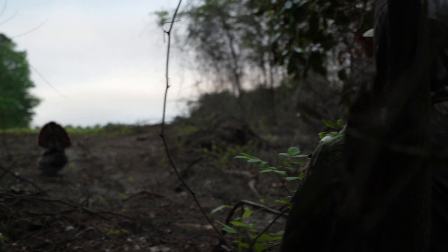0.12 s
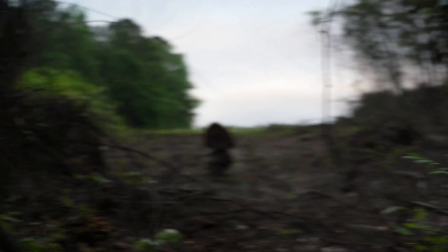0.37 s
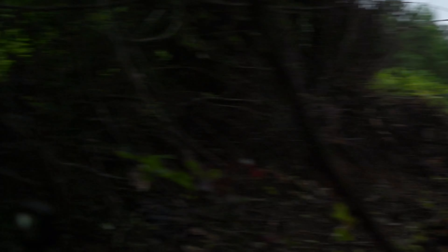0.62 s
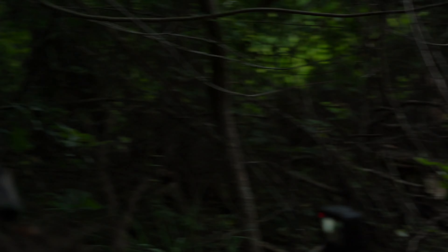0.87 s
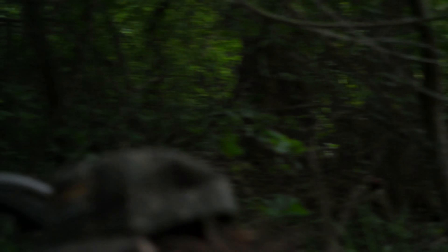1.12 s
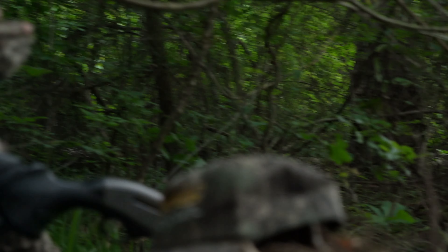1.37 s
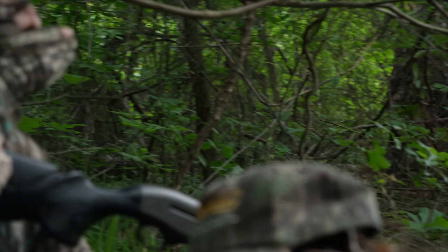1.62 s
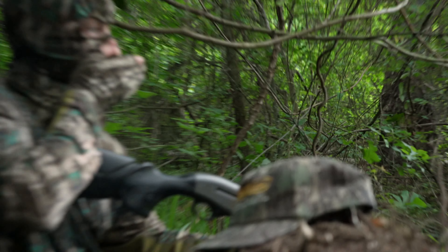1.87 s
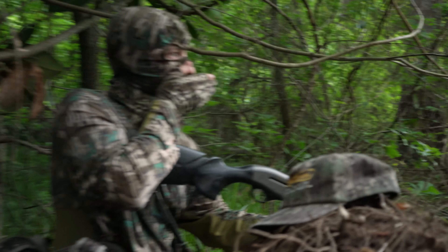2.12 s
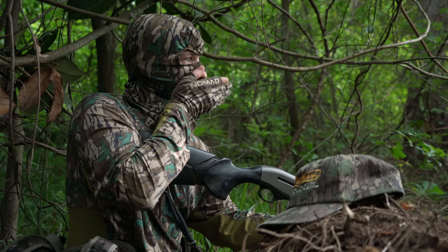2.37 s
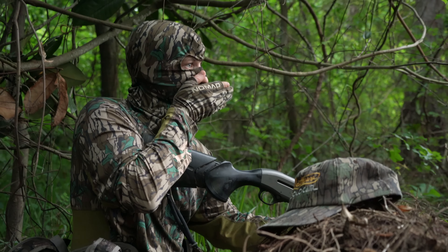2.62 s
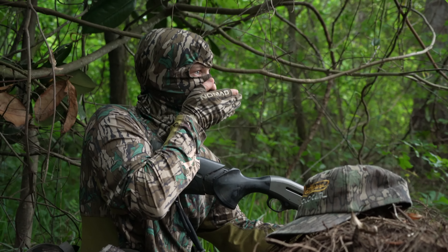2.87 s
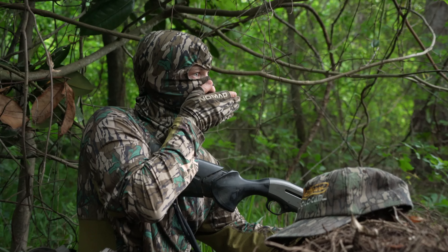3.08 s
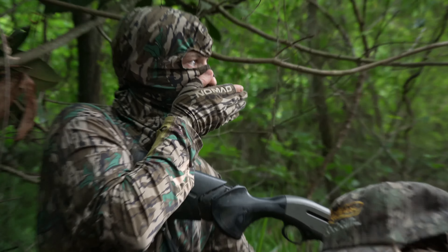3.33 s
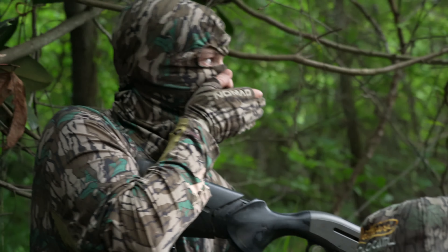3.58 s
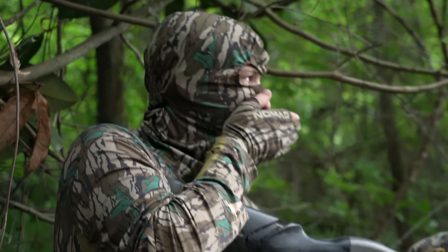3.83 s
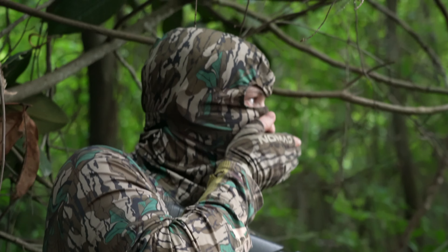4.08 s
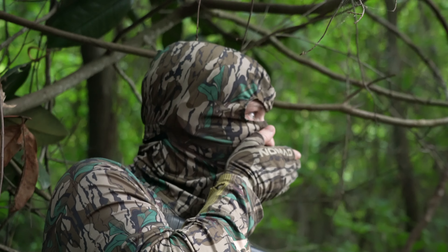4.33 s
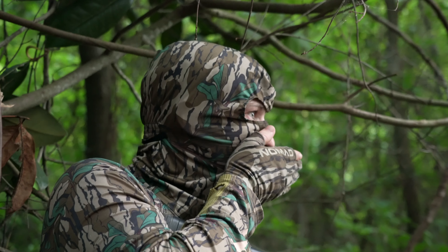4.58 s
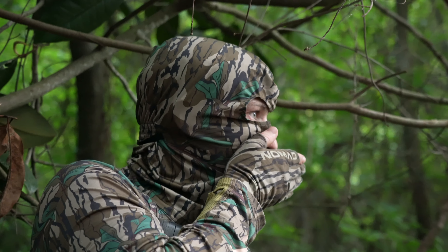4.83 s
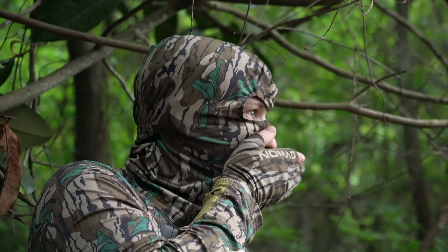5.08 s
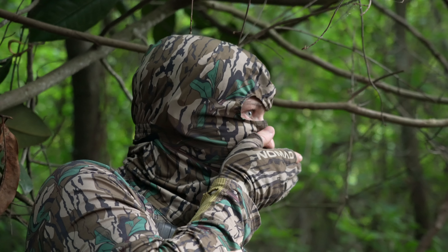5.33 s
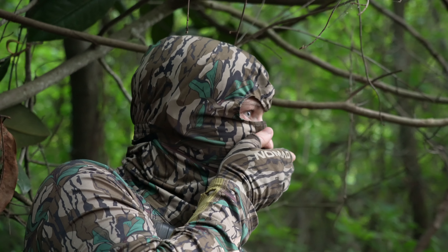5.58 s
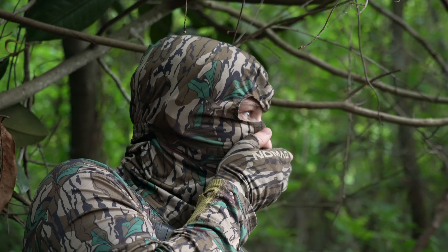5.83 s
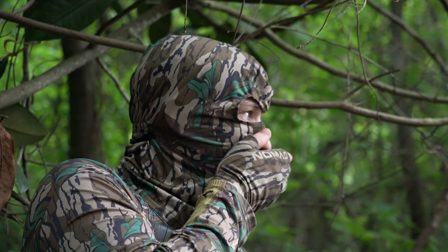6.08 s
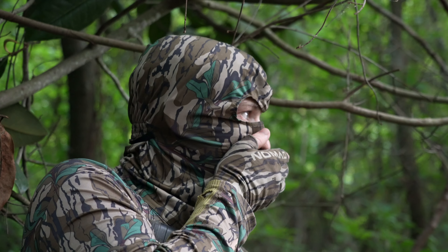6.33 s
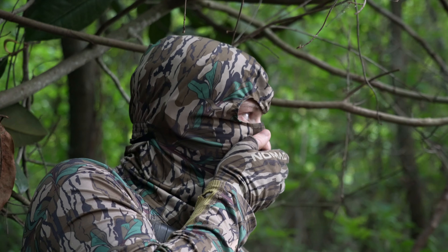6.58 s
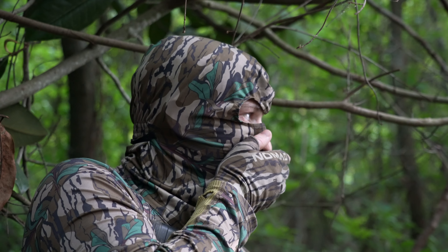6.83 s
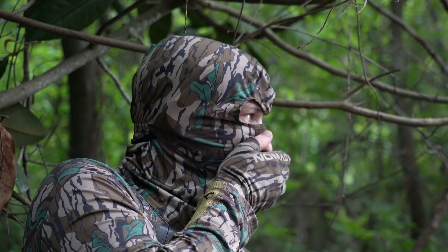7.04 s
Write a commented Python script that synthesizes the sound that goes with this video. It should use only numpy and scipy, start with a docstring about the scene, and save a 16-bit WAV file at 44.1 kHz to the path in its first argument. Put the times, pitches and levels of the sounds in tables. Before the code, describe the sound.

At the edge of a quiet wood, a reed turkey call clucks twice near the start over low handling rumble and knocks. After a gap come three short notes, hollower and cleaner, then four sharp squeak-to-rasp clucks at even spacing. Each echoes briefly off trunks. Distant birds chirp; a nearer songbird repeats a quick whistled phrase at the end. The microphone is close and hand-held.

```python
"""Turkey call at the edge of a wood

A latex-reed turkey call held in the mouth clucks and yelps: partials of a flapping reed pass through
resonances of mouth and hand, and decaying noise echoes off the trees. Three songbirds and a faint far
whistle are gliding sines. Leaves and cloth rustle as filtered noise over the air of the wood, and the
hand-held microphone rumbles and knocks in its mount, a set of damped modes."""
import sys
import numpy as np
from scipy import signal
from scipy.fft import rfft, irfft
from scipy.io import wavfile
from scipy.ndimage import uniform_filter1d, minimum_filter1d

SR = 44100
rng = np.random.default_rng(int(sys.argv[2]) if len(sys.argv) > 2 else 0)


def gain_from_db(level_db):
    """Turn a decibel level (scalar or array-like) into a linear amplitude factor."""
    decades = np.asarray(level_db, float) / 20
    return 10 ** decades


def store_wav(level_fs):
    """Save 16-bit WAV to argv[1]."""
    pcm = np.round(np.clip(np.atleast_2d(level_fs), -1, 1) * 32767)
    wavfile.write(sys.argv[1], SR, pcm.T.astype(np.int16))


N = 316638

# damped modes of the microphone mount, relative levels: mode_hz, rumble_db, knock_db, t60_s
MOUNT_MODES = [(49.9, 0.5, 1.5, 0.17), (93.5, -14.5, -8.5, 0.089), (154, -21, -1, 0.21),
               (185.6, -19.5, 2.5, 0.23), (249, -24, -3.5, 0.065), (381.3, -27, -7.5, 0.15)]


def in_time(rows):
    """Linear interpolation: the sample numbers a table covers and its columns at those samples."""
    s, *columns = np.transpose(rows)
    at = np.arange(max(int(s[0] * SR), 0), min(int(s[-1] * SR), N))
    return at, [np.interp(at / SR, s, column) for column in columns]


def at_hz(points, hz):
    """Spectral envelope: level in dB along straight lines on a log-frequency axis."""
    point_hz, point_db = np.array(points)[:, 0], np.array(points)[:, 1]
    return np.interp(np.log(hz + 1), np.log(point_hz), point_db)


def drift(rate_hz, size):
    """Slow random fluctuation of spread 1: white noise through two equal one-pole low-passes."""
    r = np.exp(-2 * np.pi * rate_hz / SR)
    slow = signal.lfilter([1], [1, -2 * r, r * r], rng.standard_normal(size + 4000))[4000:]
    return slow * np.sqrt((1 - r * r) ** 3 / (1 + r * r))


def bandpass(x, order, low_hz, high_hz):
    """Butterworth band-pass: maximally flat between its two edges."""
    return signal.sosfilt(signal.butter(order, [low_hz, high_hz], "band", fs=SR, output="sos"), x)


def coloured(spectrum):
    """Spectral shaping: white noise takes the given envelope, silent below its first point, at rms 1."""
    hz = np.fft.rfftfreq(N, 1 / SR)
    shape = gain_from_db(at_hz(spectrum, hz)) * (hz > spectrum[0][0])
    x = irfft(rfft(rng.standard_normal(N)) * shape, N)
    return x / x.std()


def ring(force, hz, t60):
    """Damped resonator: a unit click sets off a sine of starting height 1 that decays exponentially."""
    r, w = gain_from_db(-60 / (t60 * SR)), 2 * np.pi * hz / SR
    return signal.lfilter([0, np.sin(w)], [1, -2 * r * np.cos(w), r * r], force + 1e-18)


def dying(hits, t60):
    """Exponential decay: each hit starts an envelope that falls 60 dB in t60 seconds."""
    return signal.lfilter([1], [1, -gain_from_db(-60 / (t60 * SR))], hits)


def reed_note(rows, cavity, voicing):
    """Period doubling: strong-weak flapping adds half-pitch lines; chaotic flapping shakes every line."""
    # fixed resonance of the cupped hand and upper cavities: frequency_hz, level_db
    hand_curve = [(300, -42), (560, -21), (780, -9), (1200, -11), (2100, -14), (2600, -20), (3200, -24),
                  (3800, -30), (4250, -44), (5300, -44), (7000, -60), (9000, -75)]
    at, (hz, db, rasp, mouth_hz) = in_time(rows)
    rasp, high = np.clip(rasp, 0, 1), hz > 1120      # high register lies above 1120 Hz
    # half lines grow with rasp and weaken in the high register
    half_db = voicing[0] + 28 * rasp - 19 * high
    # overtones thin out when blown below -21.5 dB and in the high register; db per unit of pitch multiple
    dull_db = 0.1 * np.minimum(db + 21.5, 0)
    slope_db = np.minimum(voicing[1], 0) + dull_db - 7 * high
    hz = hz * (1 + 0.041 * rasp * drift(90, size=len(at)))
    phase = 2 * np.pi * np.cumsum(hz) / SR
    tone, power = 0, 0
    mouth_db, mouth_width_hz, shake_hz = 20, 380, 100
    for k in np.arange(1, 19) / 2:      # multiples of the pitch, in halves
        mouth_peak = mouth_db / (1 + ((k * hz - mouth_hz) / mouth_width_hz) ** 2)
        gain = gain_from_db(mouth_peak + slope_db * abs(k - 1) + half_db * (k % 1 > 0))
        shake = drift(shake_hz, size=len(at)) + 1j * drift(shake_hz, size=len(at))
        loose = 1 - (1 - rasp) ** (1 + .5 * k)      # upper lines lose their grip first
        line = np.sqrt(1 - loose) + np.sqrt(loose / 2) * shake
        tone = tone + gain * np.imag(line * np.exp(1j * k * phase + 1j * k * k))
        power = power + (gain * gain_from_db(at_hz(hand_curve, k * hz))) ** 2
    tone = tone / np.sqrt(power)
    bins, cavity_width_hz = np.fft.rfftfreq(len(at), 1 / SR), 260
    hollow_db = sum(peak_db / (1 + ((bins - peak_hz) / cavity_width_hz) ** 2)
                    for peak_hz, peak_db in (cavity[:2], cavity[2:4]))
    tone = irfft(rfft(tone) * gain_from_db(at_hz(hand_curve, bins) + hollow_db), len(at))
    # blowing pressure sets the level, so the tone's own power is evened out first
    span = int(0.015 * SR)
    tone /= np.sqrt(uniform_filter1d(uniform_filter1d(tone ** 2, span), span))
    # air leaking past the reed
    air = bandpass(rng.standard_normal(len(at)), 2, 7500, 11300)
    out = np.zeros(N)
    out[at] = gain_from_db(db) * (tone + gain_from_db(-52) * (0.38 + 4.0 * rasp) * air)
    return out


def clucks():
    """Register jump: a nearly clean squeak breaks into the reed's raspy low register."""
    # opening squeaks, swell_db added by the end: start_s, length_s, pitch_hz, level_db, swell_db
    squeak_rows = [(4.097, 0.01, 1264, -7.5, -12.5), (4.416, 0.029, 1663, -21, 7),
                   (4.779, .0125, 1274, -13, 1), (5.135, 0.012, 1218, -16, 2.5)]
    # the low register of each cluck, before shaping: length_s, pitch_hz, level_db, rasp
    rasp_rows = [(.067, 770, -12.5, 0.71), (.048, 780, -11.5, .5), (.064, 900, -10.5, 0.88),
                 (.061, 765, -10.5, 0.97)]
    # course of every rasp: fraction_of_length, pitch_ratio, added_level_db, rasp_factor
    rasp_course = [(0, 1.04, -4, .7), (0.121, 1.01, 0, .9), (.45, .97, -2, 0.87), (0.601, 1.03, -9.5, 0.94),
                   (.8, 1.12, -13, .9), (0.999, 1.16, -32, .9)]
    attack_s, rise, squeak_rasp, mouth_hz = .0055, 0.027, 0.045, 1500
    notes = []
    for (s, squeak_s, high_hz, high_db, swell_db), (rasp_s, hz, db, rasp) in zip(squeak_rows, rasp_rows):
        flip = s + squeak_s
        squeak = [
            (s, high_hz * (1 - rise), high_db - 24, squeak_rasp, high_hz),
            (s + attack_s, high_hz, high_db, squeak_rasp, high_hz),
            (flip, high_hz * (1 + rise), high_db + swell_db, squeak_rasp, high_hz)]
        # the rasp follows one of its periods after the squeak
        low = [(flip + 1 / hz + at * rasp_s, ratio * hz, db + added_db, factor * rasp, mouth_hz)
               for at, ratio, added_db, factor in rasp_course]
        notes.append(squeak + low)
    return notes


def turkey_call():
    """Source and filter: each reed note has its own cavities; returns direct sound and feed to the trees."""
    # shaped reed notes: time_s, pitch_hz, level_db, rasp (0-1), mouth_resonance_hz
    reed_rows = [
        [(.705, 756, -47, .5, 1230), (.7085, 777, -4, 0.34, 1210), (.713, 763, -9.5, 0.52, 1500),
         (.72, 742.6, -15, 0.32, 1500), (.74, 771, -18, 0.68, 1640), (.752, 796, -36, 0.73, 1560),
         (.76, 790, -55, .7, 1550)],
        [(.961, 640, -43, .3, 1200), (.9637, 627, -13, 0.77, 1310), (.9715, 686, -8.5, 0.26, 1400),
         (.974, 725, -16, 0.53, 1500), (.996, 924, -17.5, 0.53, 1880), (1.013, 934, -31, 0.38, 1900),
         (1.03, 938, -43, 0.4, 1890), (1.05, 940, -53, 0.4, 1880)],
        [(2.756, 710, -43, 0.3, 1400), (2.76, 718, -15, 0.24, 1400), (2.77, 688, -9, 0, 1400),
         (2.777, 695, -14, 0.56, 1400), (2.785, 765, -17.5, 0.83, 1500), (2.8, 820, -19, .3, 1550),
         (2.808, 806, -25, 0.46, 1400), (2.82, 850, -43, .4, 1300)],
        [(3.268, 960, -55, 0.3, 1210), (3.28, 940, -43, 0.2, 1200), (3.3, 940, -41.5, .1, 1260),
         (3.312, 920, -52.5, 0.2, 1210)],
        [(3.322, 710, -35, 0.14, 1500), (3.328, 675, -25, 0.03, 1600), (3.345, 646, -16.5, 0, 1420),
         (3.385, 656, -15, 0, 1420), (3.398, 690, -11.5, 0, 1400), (3.41, 724, -12.5, 0.06, 1470),
         (3.42, 795, -26, 0.1, 1500), (3.44, 1077, -34.5, 0, 1200), (3.448, 1100, -48.5, 0.1, 1200)],
        [(3.755, 1160, -50.5, .4, 1500), (3.759, 1012, -35.5, .4, 1430), (3.775, 694, -17, 0.34, 1450),
         (3.782, 685, -9.5, 0.13, 1540), (3.797, 689, -11, 0.07, 1445), (3.802, 697, -10.5, 0.2, 1500),
         (3.81, 733, -15.5, 0.25, 1500), (3.823, 790, -16.5, 0.1, 1550), (3.829, 900, -26, .1, 1200),
         (3.85, 1020, -54, .1, 1200)],
    ]
    # cavities behind the cupped hand, a row per note: second_hz, second_db, third_hz, third_db
    cavity_rows = [(2260, 5, 3800, 17), (2900, 3, 3420, 16), (2010, 3, 4100, 14.5), (1894, 12, 3300, 9),
                   (2020, -4.5, 5300, 22), (2070, 9.5, 3520, 11.5), (2120, 9.5, 3080, 16.5),
                   (2294, 11, 3010, 14), (2145, 12.5, 3040, 13.5), (2350, 16.5, 3080, 19.5)]
    # a row per note, the feed relative to the direct note:
    # half_lines_db before rasp, overtone_slope_db (above 0 acts as 0), feed_to_trees_db
    voicing_rows = [(-21, 1, 1.5), (-20.5, -0.5, 5.5), (-24, -1, -2.5), (-35, 0.5, 3), (-18.5, -1.7, -5),
                    (-27, 0.5, -3), (-21, 0, 1.5), (-16.5, -.4, 0.4), (-22.5, 0.8, -1.5),
                    (-24.5, 1.5, -1.1)]
    notes = [reed_note(*note) for note in zip(reed_rows + clucks(), cavity_rows, voicing_rows)]
    sent = sum(gain_from_db(voicing[2]) * note for note, voicing in zip(notes, voicing_rows))
    return sum(notes), sent


def snaps():
    """Impulsive closure: as hard notes set in the reed slaps shut in a bright and a low burst of noise."""
    # moments of closure: time_s, bright_snap_db, low_pop_db
    snap_rows = [(.708, -50, -30), (0.9646, -46, -22), (2.765, -49.5, -32), (3.785, -44, -35),
                 (4.111, -45.5, -17), (4.452, -48, -28), (4.793, -36, -22), (5.158, -33.5, -18)]
    s, snap_db, pop_db = np.transpose(snap_rows)
    out = 0
    for db, t60, band_hz in ((snap_db, 0.0082, [3800, 10000]), (pop_db, 0.054, [380, 750])):
        hits = np.zeros(N)
        hits[(s * SR).astype(int)] = gain_from_db(db)
        burst = dying(hits + 1e-18, t60) * rng.standard_normal(N)
        out = out + bandpass(burst, 2, *band_hz)
    return out


def trees(x, t60, early_t60, early_db):
    """Multiple scattering off trunks: dense noise echoes of unit energy, the early ones dying faster."""
    t = np.arange(SR) / SR
    shape = gain_from_db(-60 * t / t60) + gain_from_db(early_db - 60 * t / early_t60)
    echo = rng.standard_normal(SR) * shape * np.clip(t / 0.0047, 0, 1)
    return signal.fftconvolve(x, echo / np.sqrt(np.sum(echo ** 2)))[:N]


def whistle(rows):
    """Frequency modulation: a sine whose phase sums a gliding pitch, at the rms level given."""
    out = np.zeros(N)
    at, (hz, db) = in_time(rows)
    out[at] = np.sqrt(2) * gain_from_db(db) * np.sin(2 * np.pi * np.cumsum(hz) / SR)
    return out


def songbird(phrase, sung):
    """Superposition of gliding sines, pitch varied a little per phrase; direct sound and feed to echoes."""
    direct, scattered = np.zeros(N), np.zeros(N)
    for start, direct_db, echo_db in sung:
        shift = [1, 1 + .008 * rng.standard_normal(), 1]
        song = sum(whistle(np.array(note) * shift + [start, 0, 0])
                   for note in phrase if start + note[0][0] < N / SR)
        direct += gain_from_db(direct_db) * song
        scattered += gain_from_db(echo_db) * song
    return direct, scattered


def near_songbird():
    """Gliding pure tones: a near bird repeats a phrase of five notes."""
    # notes, relative to the phrase: time_after_start_s, pitch_hz, level_db
    five_notes = [
        [(.0005, 6300, -23), (.002, 5400, -16), (.0035, 4800, -9.5), (.0055, 4200, -21)],
        [(.004, 3300, -13), (.011, 3950, -20), (.018, 3960, -9), (.022, 3570, -19), (.027, 2930, -4),
         (.035, 2640, -3), (.044, 2700, -33)],
        [(.06, 1800, -24.5), (.067, 1993, -5.5), (.08, 2700, 1), (.088, 3050, 1.5), (.095, 3120, -21)],
        [(.121, 3480, -10), (.126, 3670, -0.5), (.136, 3710, 0), (.147, 3400, 4), (.153, 3350, -24)],
        [(.197, 2930, -15), (.203, 2733, 0), (.217, 2680, 1), (.245, 2626, -5.5), (.27, 2350, 1.5),
         (.29, 1940, -7.5), (.32, 1630, -15.5), (.35, 1473, -19.5), (.362, 1430, -42)],
    ]
    # phrases sung: start_s, direct_db, echo_db
    near_starts = [(-.017, -49.5, -42), (.403, -48, -42), (5.343, -40, -43.5), (5.747, -36.5, -39.5),
                   (6.152, -35, -38), (6.553, -35, -38), (6.959, -36, -38.5)]
    return songbird(five_notes, near_starts)


def far_songbird():
    """Gliding pure tones: a far bird sings three nearly level notes and a rising sweep."""
    # notes, relative to the phrase: time_after_start_s, pitch_hz, level_db
    sweep_notes = [
        [(0, 3970, -16), (.008, 4210, -9), (.02, 4020, -9), (.03, 4120, -25.5)],
        [(-.075, 2540, -19), (-.065, 2647, 4), (-.045, 2560, -5), (-.035, 2510, -17)],
        [(.125, 2790, -15.5), (.135, 2730, -4), (.165, 2590, -9), (.175, 2600, -15.5)],
        [(.04, 4800, -22), (.052, 5120, -1.5), (.068, 5705, -6.5), (.082, 5720, -6.5), (.098, 5950, -10.5),
         (.11, 6020, -21)],
    ]
    # phrases sung: start_s, direct_db, echo_db
    far_starts = [(3.55, -55.5, -49.5), (3.862, -50, -45), (4.18, -54.5, -44), (4.489, -54.5, -44.5),
                  (4.816, -51, -45)]
    return songbird(sweep_notes, far_starts)


def whistling_bird():
    """Gliding pure tones: a third bird gives a falling whistle and a short low note."""
    # notes, relative to the phrase: time_after_start_s, pitch_hz, level_db
    falling_notes = [
        [(0, 3470, -21), (.012, 3503, -1.5), (.047, 3410, 6.5), (.06, 3280, 0), (.066, 3250, -17)],
        [(.062, 2870, -17), (.069, 2780, 6), (.078, 2720, -2), (.085, 2700, -18)],
    ]
    # whistles sung: start_s, direct_db, echo_db
    third_starts = [(1.075, -55, -57.5), (1.645, -53.5, -56.5), (6.498, -48.5, -53)]
    return songbird(falling_notes, third_starts)


def far_whistle():
    """Frequency modulation: a faint whistle far off arches up and down in pitch."""
    # course of the whistle: time_s, pitch_hz, level_db
    arch_rows = [(3.11, 2310, -72), (3.125, 2600, -63), (3.15, 2980, -62), (3.175, 2900, -62),
                 (3.2, 2650, -64), (3.21, 2550, -72)]
    return whistle(arch_rows)


def shaking_db():
    """Addition of powers: jolts of the hands add to a wavering tremor; the sum in dB drives the mount."""
    # unsteadiness of the hands, before its waver: time_s, rumble_db
    tremor_rows = [(0, -48.5), (.3, -37.5), (1.3, -41), (2.0, -38.5), (2.45, -55), (2.8, -52.5), (3.3, -45),
                   (4.0, -48), (5.3, -52), (5.6, -60.5), (7.2, -64)]
    # jolts, rise and fall each spanning 20 dB: peak_s, rumble_db, rise_s, fall_s
    jolt_rows = [(.18, -32.5, 0.069, 0.056), (0.479, -24.5, .05, 0.081), (.62, -25, 0.14, 0.099),
                 (.8, -35.5, .12, 0.18), (0.939, -28.5, .25, 0.046), (1.12, -27, 0.082, 0.23),
                 (1.46, -49, 0.088, 0.038), (1.98, -34, .08, .1), (2.1, -27, 0.043, 0.32),
                 (2.94, -38, 0.11, 0.36), (3.139, -25, 0.26, 0.023), (3.77, -32.5, 0.034, 0.22),
                 (5.062, -48, 0.071, 0.081), (5.5, -44.5, 0.084, 0.075)]
    _, (tremor_db,) = in_time(tremor_rows)
    power = gain_from_db(tremor_db + 3.5 * drift(11, size=N)) ** 2
    t = np.arange(N) / SR
    for s, db, rise_s, fall_s in jolt_rows:
        away = np.where(t < s, (s - t) / rise_s, (t - s) / fall_s)
        power = power + gain_from_db(db - 20 * away) ** 2
    return 10 * np.log10(power)


def mount(rumble_db):
    """Modal excitation: shaking hands drive the modes with noise; knocks strike them, with tap and tick."""
    # knocks on the mount, thud_db scaled by each mode: time_s, thud_db, tap_db, tick_db
    knock_rows = [(0.4051, -42.5, -49, -66), (.448, -34, -28, -62), (.593, -35.5, -26, -41.5),
                  (.675, -35, -50, -54), (0.8943, -30, -26, -57), (0.944, -58, -41, -45),
                  (1.0978, -29, -21.5, -43.5), (1.188, -47, -44, -47), (1.625, -40, -33, -36),
                  (2.066, -25, -25.5, -56), (2.887, -71, -46, -56), (3.0384, -35.5, -41, -70),
                  (3.073, -38, -47.5, -68), (3.0959, -33.5, -19.5, -52), (3.731, -34.5, -33, -51.5),
                  (6.073, -66, -62, -52)]
    s, thud_db, tap_db, tick_db = np.transpose(knock_rows)
    at, out = (s * SR).astype(int), np.zeros(N)
    shaking = gain_from_db(rumble_db) * rng.standard_normal(N)
    for hz, shake_db, knock_db, t60 in MOUNT_MODES:
        blows = np.zeros(N)
        blows[at] = gain_from_db(thud_db + knock_db + rng.normal(0, 1, len(at)))
        # noise gain that offsets the longer build-up of slowly decaying modes
        drive = gain_from_db(shake_db) * np.sqrt(4 * np.log(1000) / (t60 * SR))
        out += ring(blows + drive * shaking, hz, t60)
    ticks, taps = np.zeros(N), np.zeros(N)
    ticks[at], taps[at] = gain_from_db(tick_db), gain_from_db(tap_db)
    bright_tick = dying(ticks, 0.043) * bandpass(rng.standard_normal(N), 2, 2500, 10000)
    dull_tap = bandpass(dying(taps, 0.033) * rng.standard_normal(N), 2, 350, 2000)
    return out + bright_tick + dull_tap


def shoves():
    """Impulse response: a smooth push of a few milliseconds sets the lowest mount mode swinging."""
    # soft shoves: time_s, push_db
    shove_rows = [(0.461, -13), (1.1, -23), (2.068, -14), (3.734, -14.5)]
    s, db = np.transpose(shove_rows)
    hits, push = np.zeros(N), np.hanning(int(.008 * SR))
    hits[(s * SR).astype(int)] = gain_from_db(db)
    lowest_hz, _, _, t60 = MOUNT_MODES[0]
    return ring(np.convolve(hits, push / push.sum())[:N], lowest_hz, t60)


def leaves_and_cloth():
    """Amplitude modulation: rustling is shaped noise whose level swells and flutters."""
    # level before a 6 dB lift and flutter: time_s, level_db
    rustle_levels = [(0, -64.5), (.2, -75.5), (.6, -64.5), (.92, -68.5), (1.1, -68.5), (1.2, -68),
                     (1.6, -69.5), (1.9, -64), (2.05, -66), (2.42, -72.5), (2.9, -71.5), (3.14, -69),
                     (3.36, -65.5), (3.7, -71.5), (4.2, -74), (4.7, -74), (5.4, -74.5), (7.2, -76)]
    # relative spectral density of the rustle: frequency_hz, density_db (per Hz)
    rustle_spectrum = [(1500, -6), (3000, 0.5), (6000, -2), (10000, -8.5), (15500, -19)]
    _, (rustle_db,) = in_time(rustle_levels)
    return gain_from_db(rustle_db + 6.0 + 1.7 * drift(25, size=N)) * coloured(rustle_spectrum)


def wood_air():
    """Stationary noise: the air of the wood is a dark steady hush that wavers very slightly."""
    # relative spectral density of the air: frequency_hz, density_db (per Hz)
    air_spectrum = [(40, 5), (160, -3), (310, -6.5), (630, -3), (1000, -5.5), (2000, -13), (3300, -15.5),
                    (4200, -25.5), (5100, -22.5), (6500, -29.5), (9000, -36), (15500, -56.5)]
    return gain_from_db(-47.5 + 0.27 * drift(4.6, size=N)) * coloured(air_spectrum)


def scene():
    """Superposition: reed, birds and their echoes over the air of the wood, plus handling."""
    call, sent = turkey_call()
    direct, scattered = np.sum([near_songbird(), far_songbird(), whistling_bird()], axis=0)
    dulled = bandpass(sent, 1, 1300, 4200)
    call_echoes = gain_from_db(-9.0) * trees(dulled, 1.66, 0.22, 21.9)
    bird_echoes = trees(scattered, 0.82, 0.17, 0.5)
    wood = call + snaps() + direct + call_echoes + bird_echoes + far_whistle()
    handling = mount(shaking_db()) + shoves()
    return (wood + handling + leaves_and_cloth() + wood_air())[None]


def roll_off(x):
    """The treble ends steeply here."""
    return signal.sosfilt(signal.butter(12, 15827, fs=SR, output="sos"), x)


def record(dry):
    """Gain control: a look-ahead limiter lowers the gain smoothly around peaks."""
    top, span = .65, int(.003 * SR)
    room = np.minimum(1, top / (np.abs(dry) + 1e-9))
    gain = uniform_filter1d(minimum_filter1d(room, 2 * span), span)
    return roll_off(dry * gain)


dry = scene()
out = record(dry)
store_wav(out)
```